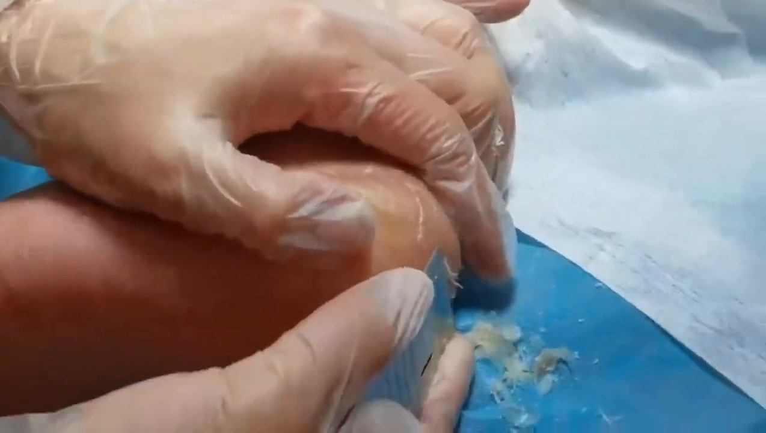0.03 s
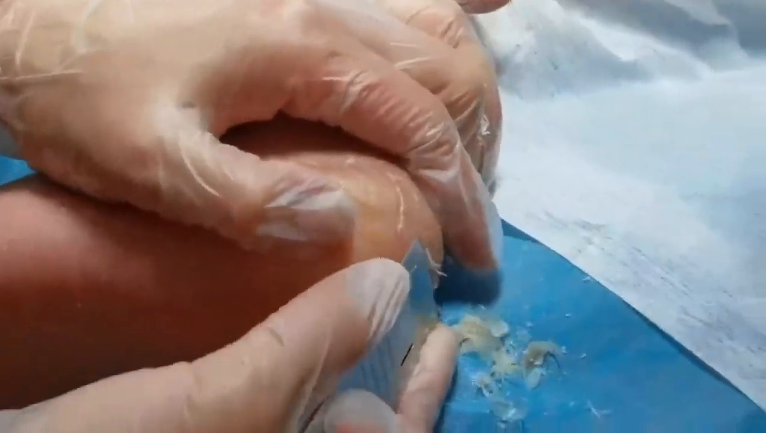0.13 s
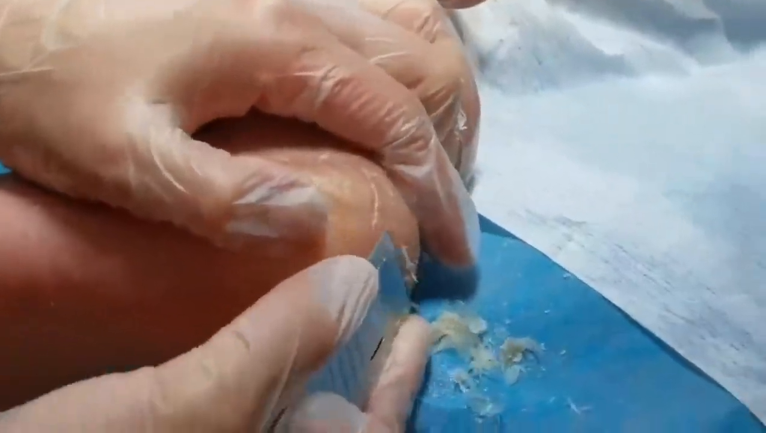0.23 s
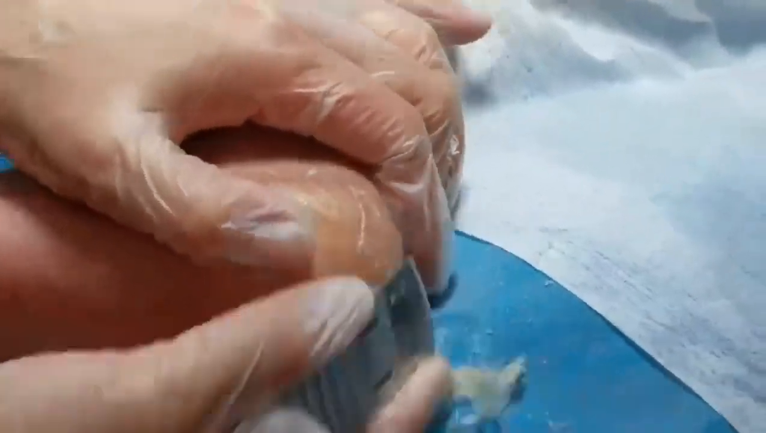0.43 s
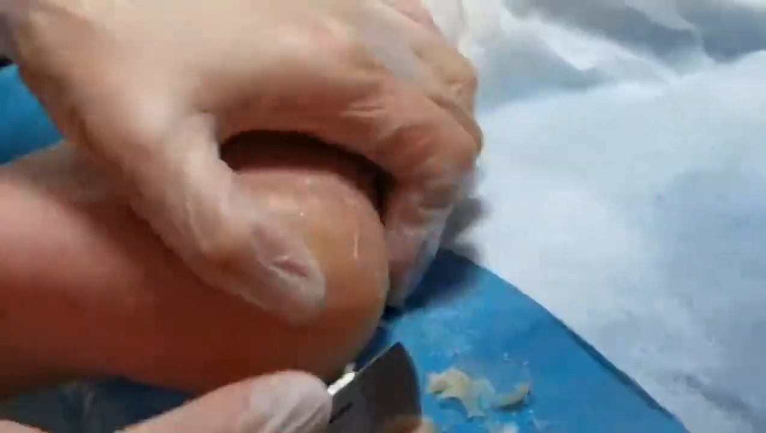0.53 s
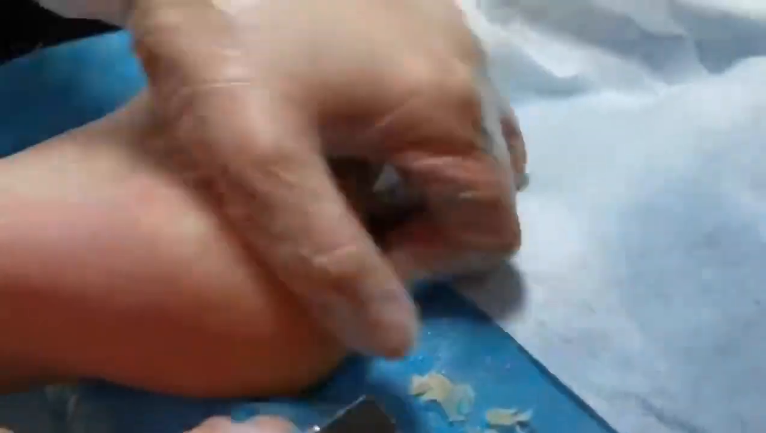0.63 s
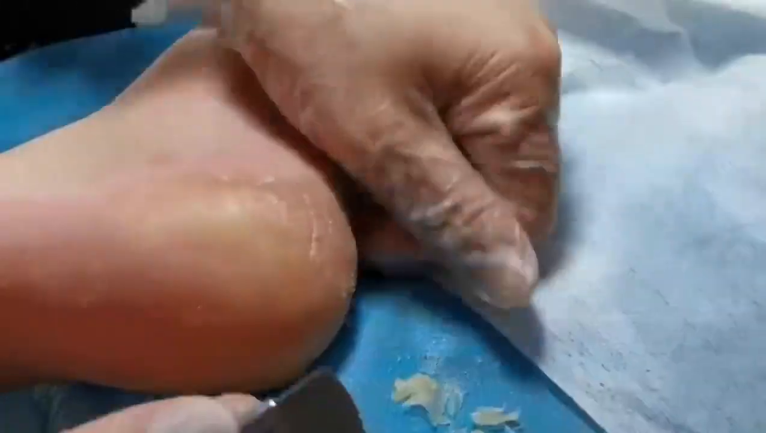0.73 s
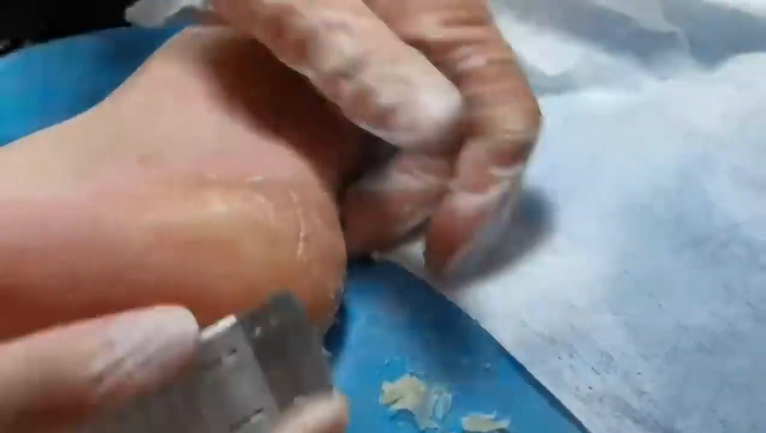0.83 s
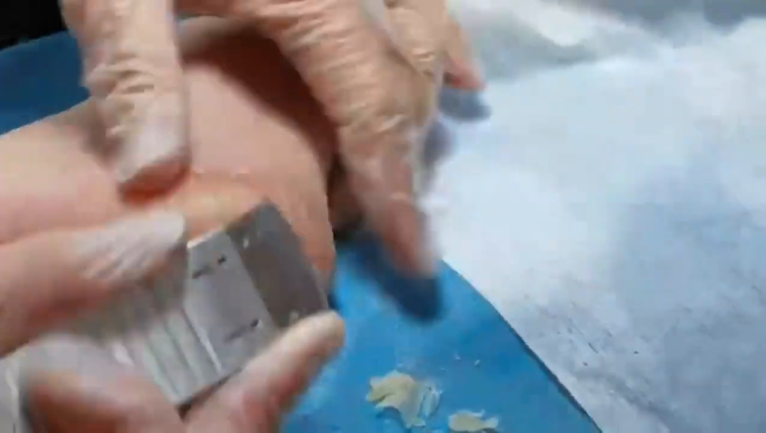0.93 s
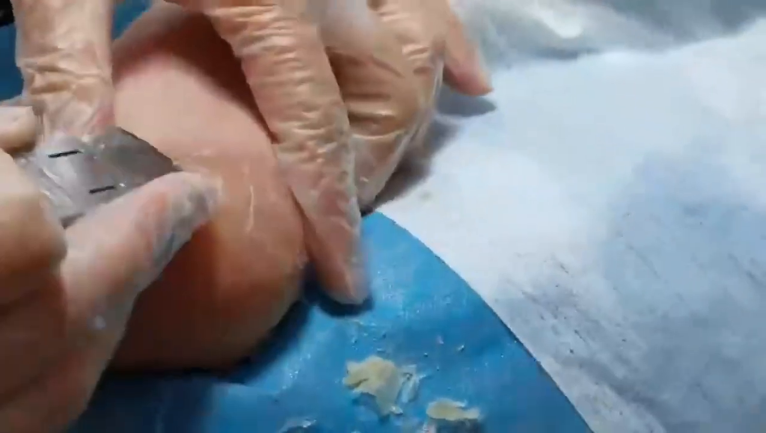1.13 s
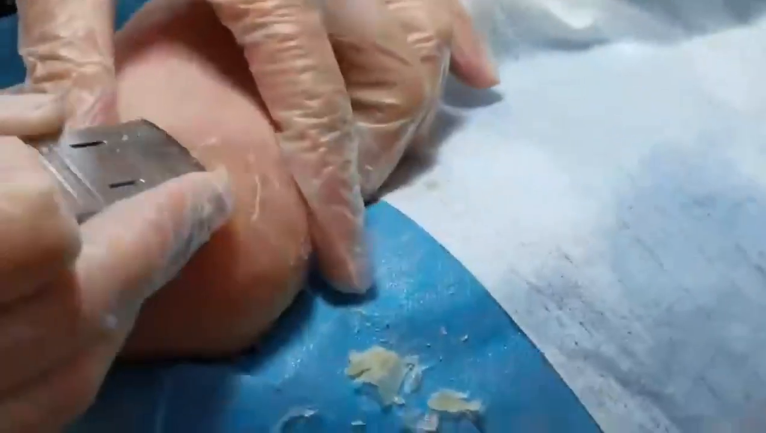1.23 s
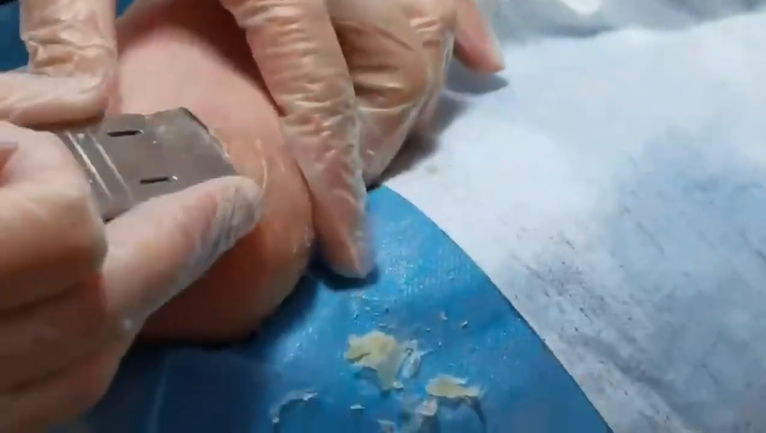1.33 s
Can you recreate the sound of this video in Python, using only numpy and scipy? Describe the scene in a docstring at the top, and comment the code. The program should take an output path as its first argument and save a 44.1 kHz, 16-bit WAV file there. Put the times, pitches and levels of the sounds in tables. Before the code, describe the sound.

A blade scrapes dry heel skin, with sharp flake snaps and gloves rubbing.

```python
"""A small, quiet room hums and hisses. Close by, a steel blade scrapes dry callus off a heel in short,
gritty strokes while gloved hands slide over the skin. The blade hand knocks against the heel, then
a hard flake breaks off with one loud snap. The foot shifts on the pad, and two bright strokes crack
off smaller flakes. The hands regrip with light taps, soft bumps and faint crinkles and ticks."""
import sys
import numpy as np
from scipy import signal
from scipy.fft import rfft, irfft, next_fast_len
from scipy.io import wavfile
from scipy.ndimage import map_coordinates

SR = 44100
rng = np.random.default_rng(int(sys.argv[2]) if len(sys.argv) > 2 else 0)


def generate_wav(signal):
    """Clip the signal to [-1, 1] and save it as 16-bit WAV at the path in sys.argv[1]."""
    frames = np.transpose(np.atleast_2d(signal))
    scaled = np.clip(frames, -1, 1) * 32767
    pcm = np.round(scaled).astype(np.int16)
    wavfile.write(sys.argv[1], SR, pcm)


N = 61739

FLUTTER_DB, FLUTTER_PER_S = 1.2, 130  # fast level flicker on scrapes and gloves


def amp(db):
    """Decibels to gain."""
    return 10 ** (np.asarray(db) / 20)


def unit(x):
    """Scale to rms 1."""
    return x / np.sqrt(np.mean(x ** 2) + 1e-20)


def clock():
    """Time of each sample in seconds."""
    return np.arange(N) / SR


def wobble(knots_per_s):
    """A smooth random modulation curve."""
    return map_coordinates(rng.standard_normal(1024), [clock() * knots_per_s], mode="wrap")


def coloured(x, colour):
    """Shape x with a minimum-phase EQ through (freq_hz, gain_db) points, at rms 1."""
    size = 4096
    hz, db = np.transpose(colour)
    curve_db = np.interp(np.log(np.fft.rfftfreq(size, 1 / SR) + 1), np.log(hz), db)
    cepstrum = irfft(np.log(amp(curve_db)))
    cepstrum[1:size // 2] *= 2  # folding the cepstrum makes the filter causal
    cepstrum[size // 2 + 1:] = 0
    impulse = irfft(np.exp(rfft(cepstrum)))
    return unit(irfft(rfft(x) * rfft(impulse, N), N))


def noise(colour):
    """Steady coloured noise at rms 1."""
    return coloured(rng.standard_normal(N), colour)


def friction(slips_per_s, spread_db, hiss_share):
    """Tiny slips of random size over a share of smooth hiss."""
    slips = (rng.random(N) < slips_per_s / SR) * np.sign(rng.standard_normal(N))
    sizes = amp(spread_db * np.minimum(rng.exponential(size=N), 4))
    return np.sqrt(1 - hiss_share) * unit(slips * sizes) + np.sqrt(hiss_share) * rng.standard_normal(N)


def patchy(x, depth_db):
    """Changing contact makes the colour uneven: patches of random gain drift through it, at rms 1."""
    patch_hz, patch_s = 265.6, 0.0504
    hz, t, spectrum = signal.stft(x, SR, nperseg=1024)
    grid = np.meshgrid(hz / patch_hz, t / patch_s, indexing="ij")
    patches = map_coordinates(rng.standard_normal((256, 256)), grid, mode="wrap")
    return unit(signal.istft(spectrum * amp(depth_db * patches), SR, nperseg=1024)[1][:N])


def stroke(peak_s, rise_s, hold_s, fall_s):
    """Envelope of one movement: swell, hold, fade; rise and fall each span 20 dB."""
    t = clock() - peak_s
    return amp(-20 * (np.maximum(-t, 0) / rise_s + np.maximum(t - hold_s, 0) / fall_s))


def add(track, start_s, sound):
    """Mix a sound in at start_s."""
    part = track[int(start_s * SR):][:len(sound)]
    part += sound[:len(part)]


def room_tone():
    """A bed of wavering mains hum, low rumble and faint hiss."""
    # hum partials: pitch_hz, initial_level_db, drift_db_per_s
    partials = [(100.2, -56.5, -3), (200, -62.5, -11.5), (303.6, -59, -5)]
    # EQ of the rumble and of the airy hiss: freq_hz, gain_db
    rumble_colour = [(20, -19), (45, -4.5), (70, -1.5), (95, 5.5), (150, -9), (300, -12), (500, -19.5),
                     (900, -29), (2500, -51)]
    air_colour = [(500, -2), (900, -13), (2100, -5), (2700, -14), (3600, -9), (5700, 2.5), (8000, 0),
                  (10800, -7.5), (11800, -33), (13500, -23)]
    waver_db, rumble_db, air_db = 2.5, -56.5, -67
    hum, t = np.zeros(N), clock()
    for pitch_hz, level_db, drift_db_per_s in partials:
        gain = amp(level_db + drift_db_per_s * t + waver_db * wobble(11.65))
        hum += gain * np.sqrt(2) * np.sin(2 * np.pi * (pitch_hz * t + rng.random()))
    return hum + amp(rumble_db) * noise(rumble_colour) + amp(air_db) * noise(air_colour)


def scrapes():
    """The edge catches on dry skin in dense slips and rings the blade; strokes vary in brightness."""
    # blade strokes: peak_s, rise_s, fall_s, level_db, treble_tilt_db_per_octave
    strokes = [(.036, 0.048, 0.08, -45, -4.5), (0.114, 0.035, 0.035, -53, -5),
               (0.23, 0.021, 0.076, -49, -3), (0.275, 0.064, 0.023, -40, -5),
               (0.355, 0.025, 0.044, -32.5, -6), (0.405, 0.085, 0.046, -32, -4.5),
               (.488, .085, 0.12, -34.5, -10.5), (.565, 0.091, 0.21, -42.5, -8.5),
               (0.628, 0.065, 0.031, -29.5, 2.5), (0.705, 0.04, 0.044, -30, 3)]
    # EQ of steel on callus: freq_hz, gain_db
    scrape_colour = [(100, -44), (600, -37), (1000, -24), (1600, -22), (2200, -14), (3100, -13.5),
                     (3950, -6), (4600, -6), (5400, -4), (6600, -3), (7750, 2), (8900, -15), (10600, -11.5),
                     (11800, -22), (13800, -17.5)]
    pivot_hz, ring_db = 2600, -5
    out = np.zeros(N)
    for peak_s, rise_s, fall_s, level_db, tilt in strokes:
        colour = [(hz, db + tilt * np.log2(max(hz / pivot_hz, 1))) for hz, db in scrape_colour]
        skin, steel = (friction(slips_per_s=3000, spread_db=3, hiss_share=0.32) for _ in range(2))
        grit = coloured(skin, colour) + amp(ring_db) * blade_ring(steel)
        out += amp(level_db) * stroke(peak_s, rise_s, 0, fall_s) * patchy(grit, depth_db=4)
    return out * amp(FLUTTER_DB * wobble(FLUTTER_PER_S))


def blade_ring(slips):
    """The steel, damped by the fingers, adds a few short rings that shift with each grip."""
    # blade resonances: pitch_hz, width_hz, level_db
    modes = [(5410, 160, 5), (5850, 73, 5), (6570, 150, 6.5), (6730, 90, 6.5), (7670, 380, 5)]
    grip_detune = np.exp(0.015 * rng.standard_normal())
    f = np.fft.rfftfreq(N, 1 / SR) * grip_detune
    rings = 0
    for k, (pitch_hz, width_hz, level_db) in enumerate(modes):
        resonance = 1j * f * width_hz / (pitch_hz ** 2 - f ** 2 + 1j * f * width_hz)
        rings += (-1) ** k * amp(level_db) * resonance
    return unit(irfft(rfft(slips) * rings, N))


def gloves():
    """Sliding gloves hiss; pressure adds a coarser, lower rub that judders as it sticks and slips."""
    # glove slides: peak_s, rise_s, hold_s, fall_s, hiss_db, rub_db
    slides = [(0.28, 0.071, 0.012, 0.027, -50.5, -49.5), (0.331, 0.018, 0.095, 0.021, -43.5, -52.5),
              (0.466, 0.072, 0.043, 0.083, -33.5, -37.5), (0.548, 0.16, 0.023, 0.069, -35.5, -48),
              (0.645, 0.012, 0.0044, 0.031, -40.5, -43), (0.698, 0.078, 0.013, 0.11, -43.5, -54),
              (0.803, 0.049, 0.033, 0.078, -37.5, -41), (0.881, 0.022, 0.0064, .11, -48.5, -63.5),
              (0.989, 0.029, 0.0039, 0.38, -56.5, -65.5), (1.079, 0.024, 0.018, 0.087, -49.5, -64)]
    # EQ of the light hiss and of the pressed rub: freq_hz, gain_db
    hiss_colour = [(500, -24), (1400, -13), (2200, -9.5), (3000, -7), (4000, -3), (5600, 1.5), (7600, 5),
                   (8800, -0.5), (10900, 4), (11700, -16), (13400, -37), (14200, -38)]
    rub_colour = [(50, -4), (150, -3), (260, -0.5), (450, -1), (800, -2.5), (1400, -2.5), (1800, -2),
                  (2200, 1.5), (3200, -10), (6000, -13)]
    pressure_power = 1.13  # the rub comes later and leaves sooner than the hiss
    judder_db, judder_per_s = 2, 300
    texture = dict(spread_db=2.5, hiss_share=0.69)
    hiss_energy, rub_energy = np.zeros((2, N))
    for *timing, hiss_db, rub_db in slides:
        envelope = stroke(*timing)
        hiss_energy += (envelope * amp(hiss_db)) ** 2
        rub_energy += (envelope ** pressure_power * amp(rub_db)) ** 2
    fine = coloured(friction(slips_per_s=5100, **texture), hiss_colour)
    judder = amp(judder_db * wobble(judder_per_s))
    coarse = coloured(judder * friction(slips_per_s=1200, **texture), rub_colour)
    hiss = np.sqrt(hiss_energy) * patchy(fine, depth_db=4)
    rub = np.sqrt(rub_energy) * patchy(coarse, depth_db=3)
    return (hiss + rub) * amp(FLUTTER_DB * wobble(FLUTTER_PER_S))


def heel_knock():
    """The blade hand knocks against the heel: a few hollow, quickly damped modes."""
    # body of the knock: pitch_hz, level_db, t60_s
    modes = [(302, 0.5, 0.023), (535, -20, 0.053), (900, -31.5, 0.067)]
    start_s, gain_db, attack_s = 0.2438, -17.5, 0.0027
    out, t = np.zeros(N), clock()[:SR // 10]
    ring = sum(amp(db - 60 * t / t60_s) * np.sin(2 * np.pi * hz * t) for hz, db, t60_s in modes)
    attack = 1 - np.exp(-(t / attack_s) ** 2)
    add(out, start_s, amp(gain_db) * attack * ring)
    return out


def pad_bumps():
    """Flesh on the pad: a dull push that dies within a few cycles."""
    # soft bumps of hand and heel: start_s, level_db, pitch_hz, swell_s
    bumps = [(0.2552, -37, 257, 0.0075), (.272, -43, 199, 0.0047), (0.795, -36, 242, 0.005),
             (0.855, -45.5, 99.3, .014), (0.953, -36, 88, 0.0063), (0.981, -36.5, 116.5, 0.0048),
             (1.152, -45.5, 92.3, 0.022), (1.195, -45, 94, 0.012), (1.341, -49.5, 100.2, .011)]
    thud_gain = 0.33
    out, t = np.zeros(N), clock()[:SR // 5]
    for start_s, level_db, hz, swell_s in bumps:
        thud = noise([(hz / 2, -14), (hz, 0), (1.85 * hz, -6), (3 * hz, -40)])[:len(t)]
        envelope = (t / swell_s * np.exp(1 - t / swell_s)) ** 2
        add(out, start_s, amp(level_db) * envelope * (np.sin(2 * np.pi * hz * t) + thud_gain * thud))
    return out


def snaps_and_crinkles():
    """Flake snaps, then faint regrip crinkles: each a sharp click, a broad crack and a crumbly tail."""
    # sharp snaps of flakes, then faint crinkles and ticks as the hands regrip: start_s, level_db
    hits = [(.2633, -31), (.3634, -7.5), (0.3739, -24.5), (0.6195, -19), (0.631, -21.5), (.7068, -23),
            (.988, -44), (1.165, -44), (1.281, -48)]
    # EQ of the crack and of the crumbly tail: freq_hz, gain_db
    crack_colour = [(300, -18), (700, -11), (1250, 1), (2600, -5), (3300, -8), (4200, -3), (5200, 6),
                    (9500, -3), (10500, -7), (12600, -3), (14000, -12)]
    crumble_colour = [(200, -4), (650, -17.5), (1100, -6), (2400, -5), (3300, -6), (4200, -12), (5000, 4),
                      (6300, 7), (7400, 10), (8600, 2), (10000, -29), (12500, -10), (14000, -46)]
    click_hz, swell_s = 6650, 0.00031
    noise_db, crack_t60_s, crumble_t60_s = -15.5, 0.011, 0.033
    out, t = np.zeros(N), clock()[:SR // 20]
    click = (t / swell_s * np.exp(1 - t / swell_s)) ** 3 * np.sin(2 * np.pi * click_hz * t)
    for start_s, level_db in hits:
        crack = amp(noise_db - 60 * t / crack_t60_s) * noise(crack_colour)[:len(t)]
        crumble = amp(noise_db - 60 * t / crumble_t60_s) * noise(crumble_colour)[:len(t)]
        add(out, start_s, amp(level_db) * (click + crack + crumble))
    return out


def foot_shift():
    """A muffled rub as the foot moves on the pad."""
    # EQ of the foot on the pad: freq_hz, gain_db
    pad_colour = [(50, -21.5), (100, 9.5), (160, -4), (260, -1), (400, -1.5), (650, -15), (1200, -28),
                  (3000, -53)]
    return amp(-49.5) * stroke(peak_s=0.5, rise_s=0.051, hold_s=0.18, fall_s=0.6) * noise(pad_colour)


def finger_taps():
    """Fingertips take a new grip, landing on the blade with a short, dull tick."""
    # light taps: peak_s, relative_level_db
    taps = [(.946, -38), (0.961, -43.5)]
    # EQ of a fingertip's tick: freq_hz, gain_db
    tap_colour = [(200, 12), (700, 0), (1300, -2.5), (2200, -9.5), (3200, -10), (6000, -3), (12000, -25)]
    return sum(amp(db) * stroke(peak_s, rise_s=0.0013, hold_s=0, fall_s=0.018) * noise(tap_colour) / 2
               for peak_s, db in taps)


def room_reverb(x):
    """Six early reflections off near surfaces and the short tail of a small room."""
    tail_db, t60_s = -17.5, 0.49
    walls_db, spread_s = -12.5, 0.012
    t = clock()[:SR // 2]
    tail = rng.standard_normal(len(t)) * amp(-60 * t / t60_s) * (t > 0.004)
    delays_s = 0.001 + spread_s * rng.random(size=6)
    walls = np.bincount((SR * delays_s).astype(int), minlength=len(t))
    impulse = amp(tail_db) * tail / np.linalg.norm(tail) + amp(walls_db) * walls / np.linalg.norm(walls)
    return signal.fftconvolve(x, impulse)[:N]


def scene():
    """Blade and hands up close, with a little reverb, over the room tone; mono."""
    near = scrapes() + gloves() + snaps_and_crinkles() + finger_taps()
    near = near + heel_knock() + pad_bumps() + foot_shift()
    return (near + room_reverb(near) + room_tone())[None]


def record(dry):
    """The recorder's band limit: a steep low-pass on the top end."""
    cutoff_hz = 13900
    size = next_fast_len(N + SR // 10)
    hz = np.fft.rfftfreq(size, 1 / SR)
    lowpass = 1 / (1 + (hz / cutoff_hz) ** 120)
    return irfft(rfft(dry, size) * lowpass, size)[:, :N]


dry = scene()
out = record(dry)
generate_wav(out)
```